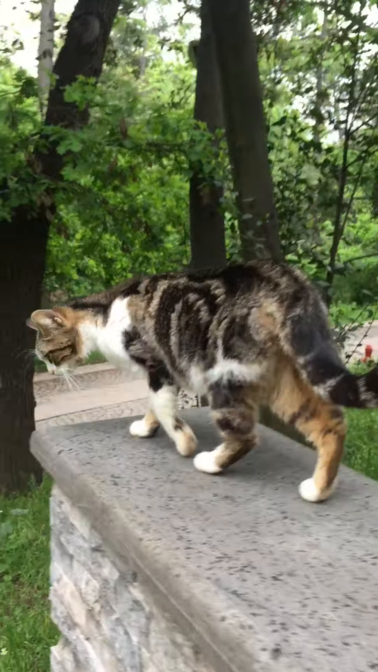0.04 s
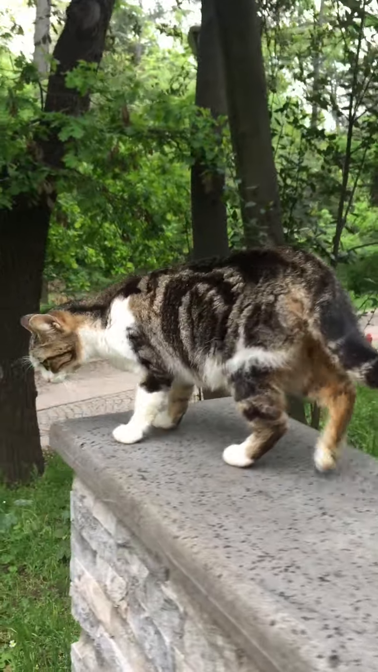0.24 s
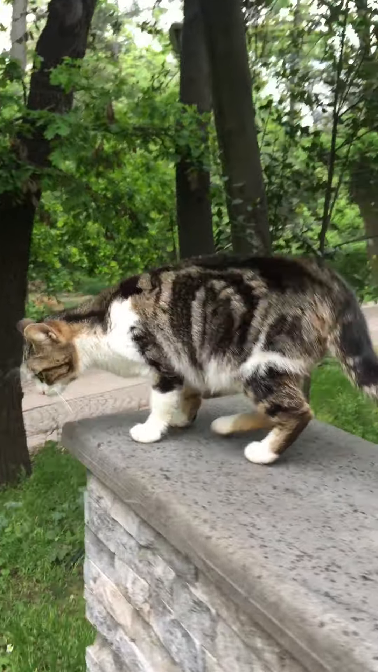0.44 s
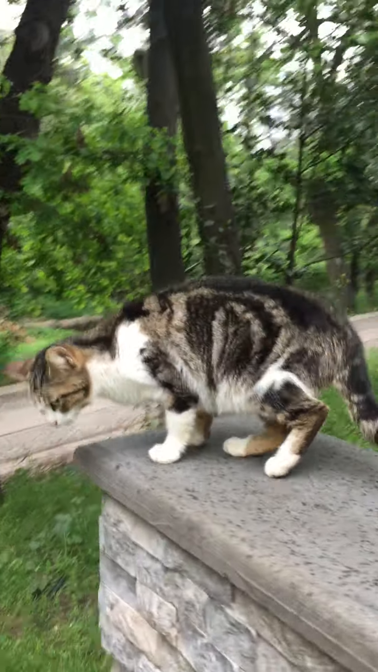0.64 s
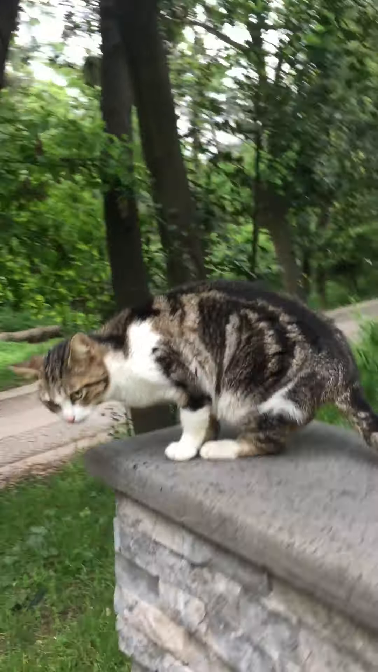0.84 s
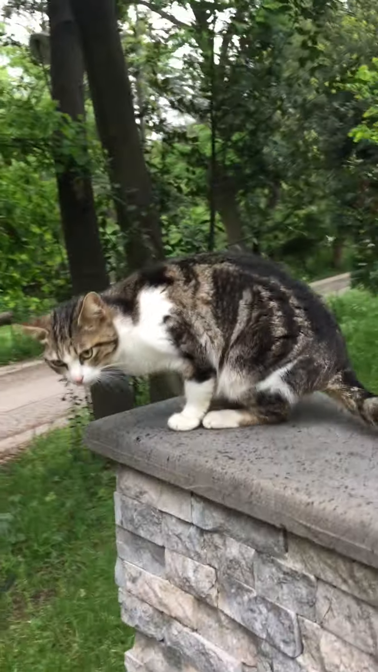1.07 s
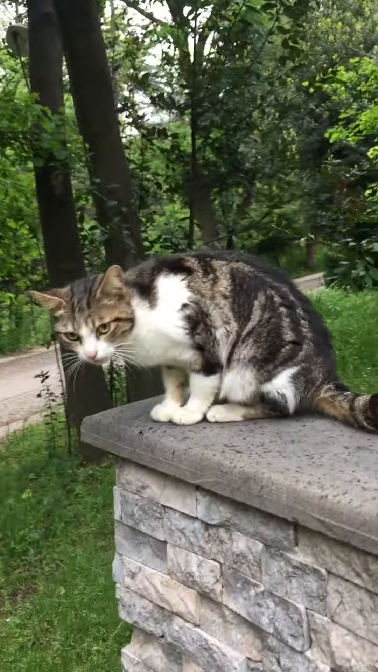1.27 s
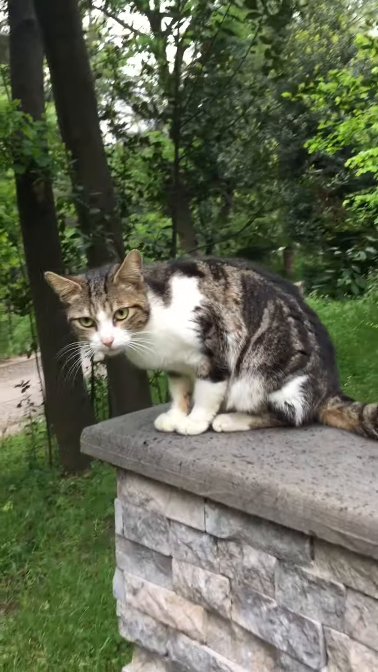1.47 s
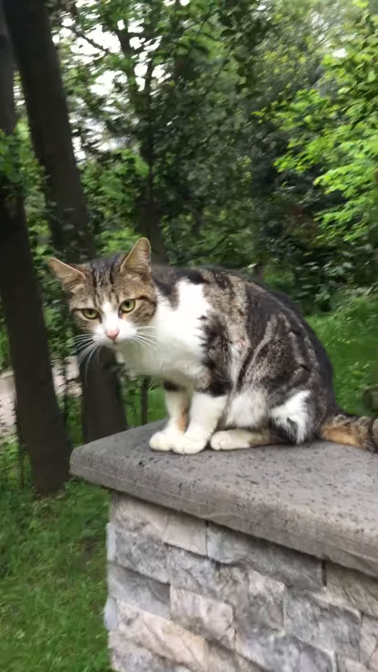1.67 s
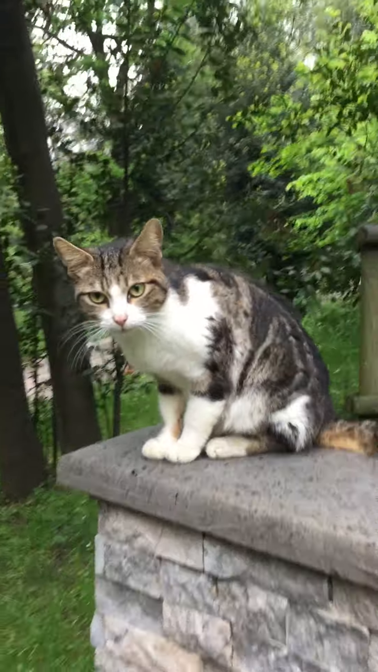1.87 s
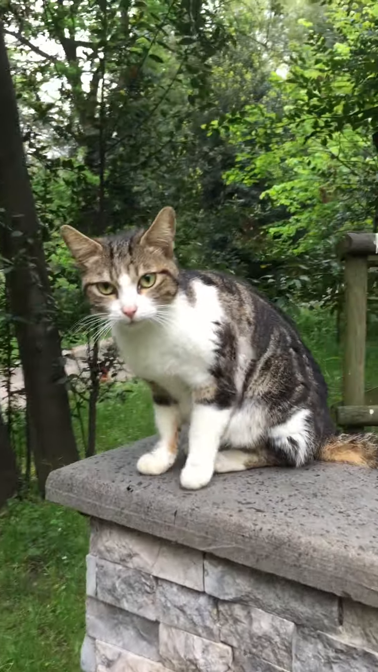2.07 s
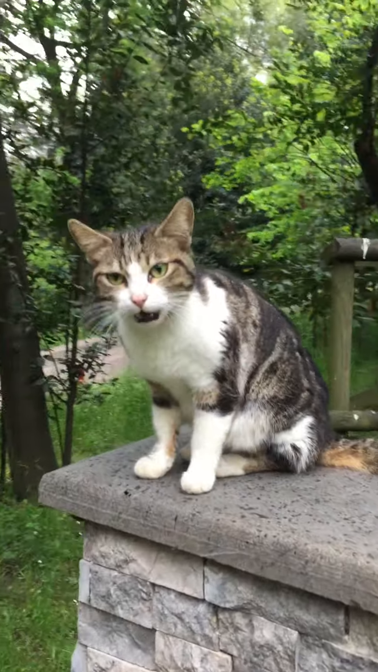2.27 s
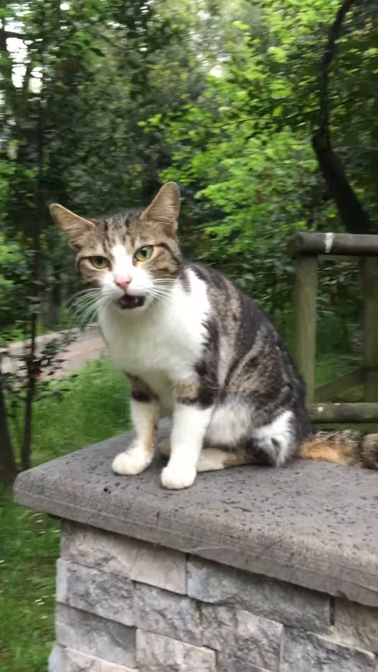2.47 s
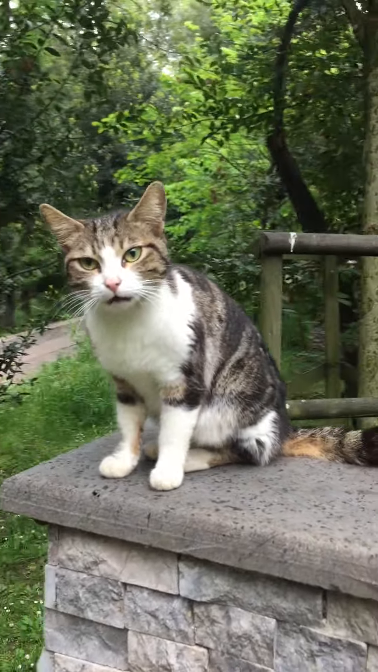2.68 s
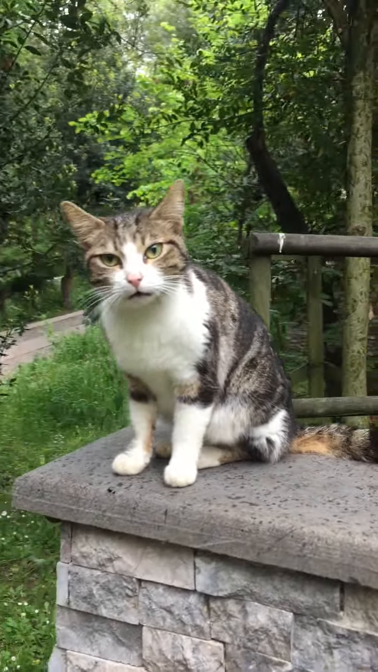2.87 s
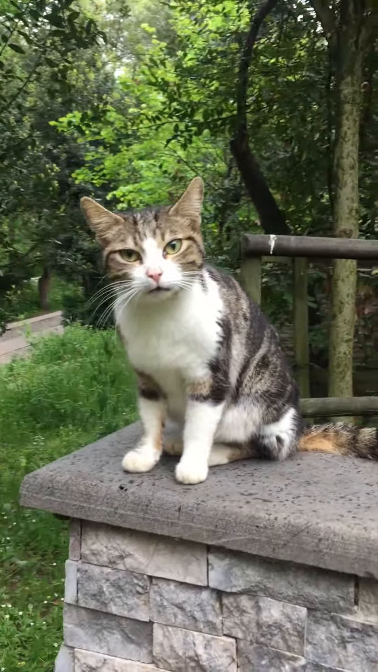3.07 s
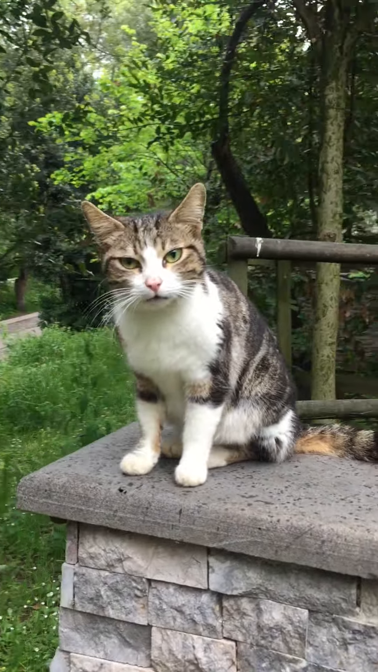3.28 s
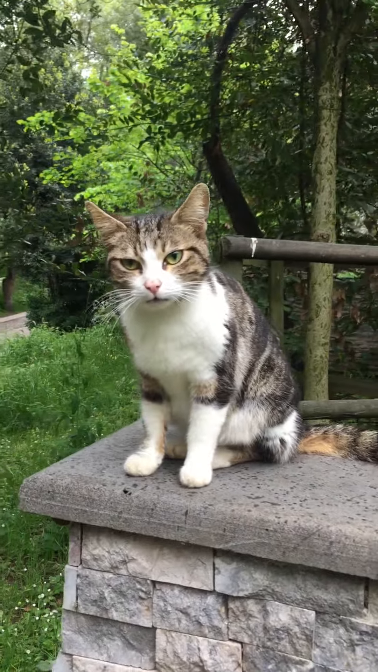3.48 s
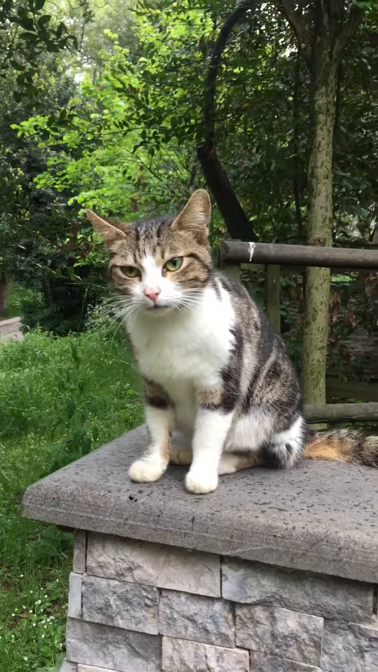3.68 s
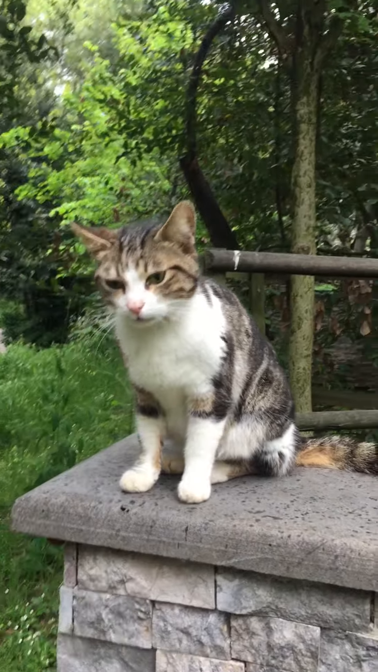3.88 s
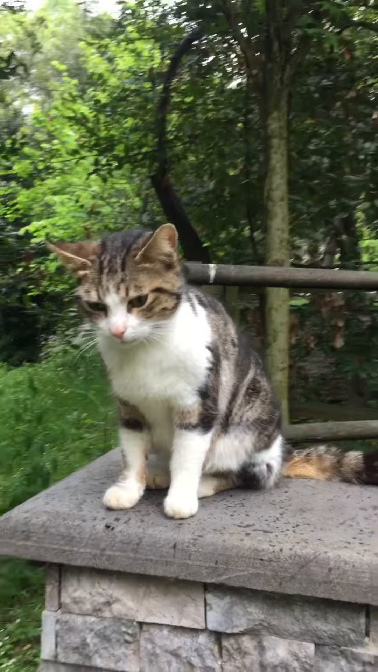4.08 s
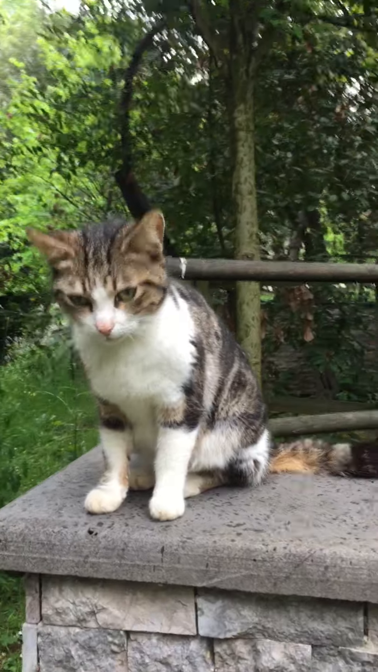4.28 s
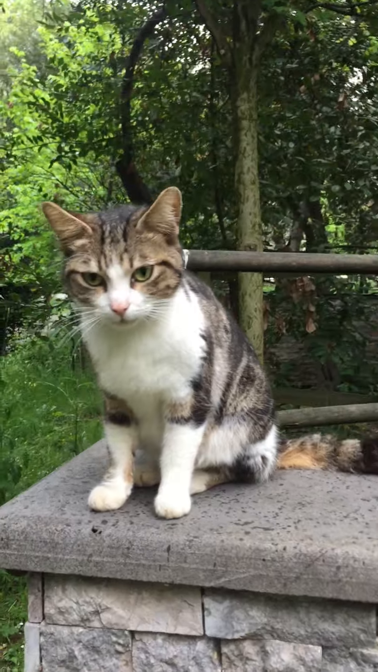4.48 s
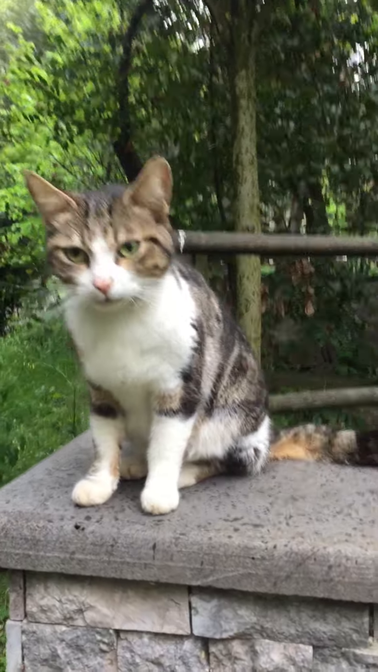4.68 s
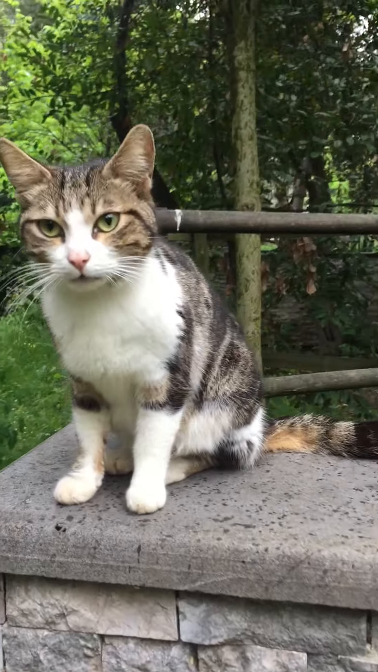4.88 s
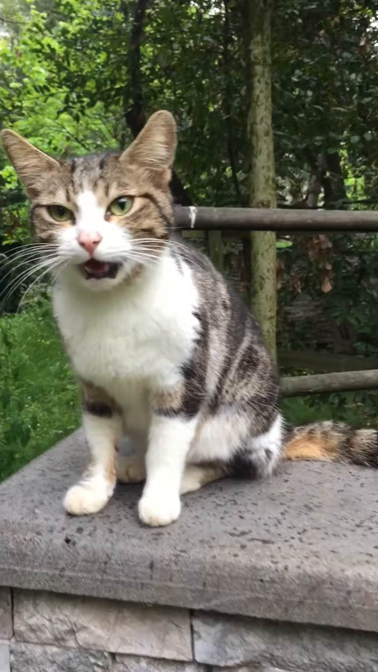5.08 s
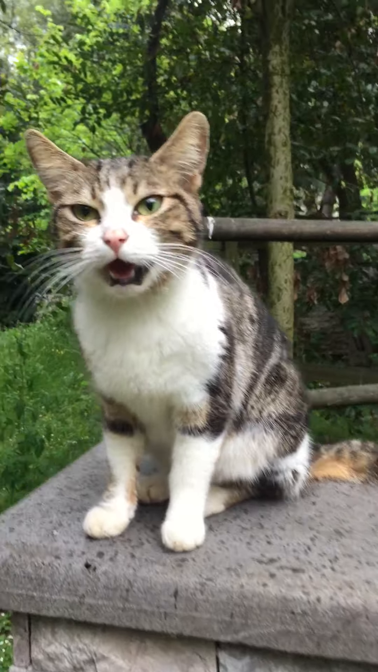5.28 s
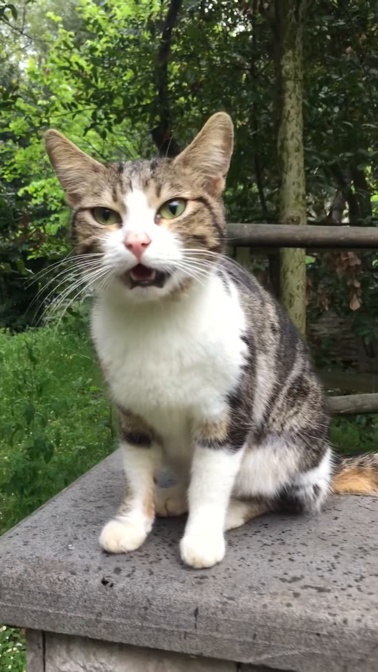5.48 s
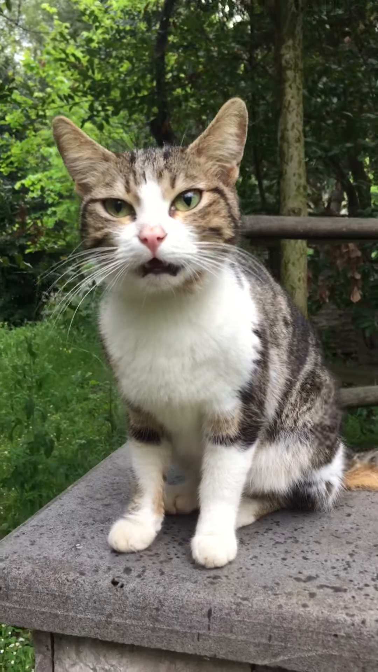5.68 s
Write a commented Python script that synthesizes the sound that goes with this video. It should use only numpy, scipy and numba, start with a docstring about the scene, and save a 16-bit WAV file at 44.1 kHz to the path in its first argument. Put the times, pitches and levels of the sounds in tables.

```python
"""Distant traffic rumbles across a park and birds call from the trees; then a cat on a stone wall,
close to the phone, gives two low, raspy meows with small ticks and rustles around them.
Its vocal folds snap in uneven pulses that ring the throat, and the resonances sink as the mouth closes.
Birds are arched whistles, ticks are ringing bursts of noise, and the traffic is banded noise and hums."""
import sys
import numpy as np
from scipy import signal
from scipy.fft import rfft, irfft
from scipy.io import wavfile
from scipy.ndimage import uniform_filter1d
from numba import njit

SR = 44100
rng = np.random.default_rng(int(sys.argv[2]) if len(sys.argv) > 2 else 0)


def bounce(signal):
    """Save signal as a 16-bit WAV file at the path given by the first command-line argument."""
    frames = np.transpose(np.atleast_2d(signal))
    limited = np.clip(frames, -1, 1)
    pcm = np.round(limited * 32767).astype(np.int16)
    wavfile.write(sys.argv[1], SR, pcm)


N = 253134

# The two calls of the cat. Each row: start in seconds, end in seconds, time constant of the opening
# treble in seconds, steady scatter of the cycle length as a share, steady air noise as a share.
MEOWS = [(2.419, 2.965, .11, .013, .18), (5.262, 5.78, .2, .004, .1)]
# Vocal fold rate of each meow. Each row: time in seconds, pitch in Hz.
PITCH_1 = [(2.42, 225.1), (2.488, 240.2), (2.518, 236.7), (2.558, 275.2), (2.578, 279.6), (2.67, 260.4),
           (2.736, 199.5), (2.754, 191), (2.806, 189.0), (2.9, 125.2), (2.95, 145.7)]
PITCH_2 = [(5.29, 327), (5.312, 324.5), (5.346, 290.7), (5.42, 286.4), (5.458, 280), (5.534, 272.6),
           (5.56, 250.6), (5.59, 250.5), (5.628, 223), (5.638, 221.6), (5.7, 199.7), (5.716, 168.7),
           (5.74, 171.6)]
# Strength of each meow. Each row: time in seconds, level of the first resonance in dB.
EFFORT_1 = [(2.42, -54.5), (2.454, -47.5), (2.662, -44.5), (2.866, -49.5), (2.89, -54.5), (2.944, -51.5),
            (2.96, -51.5)]
EFFORT_2 = [(5.27, -65), (5.306, -47.5), (5.376, -41.5), (5.554, -39), (5.62, -41.5), (5.674, -41.5),
            (5.74, -45.5)]
# Mouth shape of each meow. Each row: time in seconds, vowel (0 = ee, 1 = eh, 2 = ah, 3 = ow).
MOUTH_1 = [(2.42, 1.12), (2.5, 1.62), (2.63, 1.84), (2.73, 2.5), (2.95, 2.75)]
MOUTH_2 = [(5.286, -0.5), (5.316, 1.4), (5.37, 1), (5.52, 1.77), (5.63, 2), (5.74, 2.5)]
# The vowels ee, eh, ah, ow. Each row: first, second, third and fourth resonance in Hz, then the
# second, third and upper resonances in dB relative to the first.
VOWELS = [(1000, 2210, 2680, 3600, 19, 18, 3.5), (1046, 1984, 3080, 4020, 5.5, 2, -0.5),
          (1049, 1817, 2910, 4350, -0.5, 0, -10), (1015, 1330, 2680, 4400, -8, -14, -27.5)]
# Weak low resonance of chest and nose. One row: centre in Hz, width in Hz, dB relative to the first.
NOSE = (630, 210, -13.5)
# Upper throat resonances at rest. Each row: centre in Hz, width in Hz, relative level in dB.
UPPER = [(4590, 98, 6), (5230, 600, 2.5), (6490, 760, 3), (7030, 1500, 1.5), (7900, 2700, 1),
         (9340, 680, -3.5)]
# Brief cracks of the voice. Each row: time in seconds, extra scatter as a share.
CRACKS = [(2.54, .045), (2.59, .018), (2.72, .035), (5.42, .03), (5.47, .009), (5.5, .01), (5.64, .022)]
# Ticks of paws, lips and throat, and rustles. Each row: start in seconds, level in dB, centre in Hz,
# width in Hz, decay in seconds.
TICKS = [(.235, -75, 11000, 8000, .03), (2.358, -63, 11600, 6000, .006), (2.414, -50, 2600, 2980, 0.0037),
         (2.939, -51.5, 362, 129.8, 0.032), (2.953, -52, 1700, 1200, 0.018), (2.967, -54, 4310, 200, 0.012),
         (2.971, -63, 6260, 905, 0.029), (4.835, -68.5, 6450, 8000, 0.021), (5.014, -66, 6000, 10800, 0.15),
         (5.265, -41, 2310, 1000, 0.0027), (5.273, -33, 2430, 910, 0.001)]
# Bird notes. Each row: start in seconds, length in seconds, start, middle and end pitch in Hz,
# level in dB.
BIRDS = [(0.815, 0.12, 7500, 7750, 7570, -65.5), (.81, 0.26, 1190, 1161, 1106, -64),
         (1.304, 0.062, 2020, 2016, 1940, -63.5), (1.566, 0.092, 2057, 1964, 1830, -55.5),
         (1.865, 0.069, 1963, 1980, 1900, -54), (2.147, 0.073, 2056, 1967, 1930, -59.5),
         (2.877, 0.052, 4280, 3720, 3230, -66), (3.11, 0.061, 2880, 2810, 2700, -73),
         (3.431, 0.057, 2830, 2780, 2750, -73), (4.042, 0.047, 3370, 3120, 2920, -64),
         (4.165, 0.061, 7400, 7500, 6600, -61.5)]
# Spectrum of the distant traffic. Each row: frequency in Hz, relative density in dB per Hz.
PARK = [(15, -47), (25, -39), (49, 2.5), (96, 1.5), (123, -4), (161, -3.5), (275, -8.5), (351, -17.5),
        (570, -27.5), (1120, -26.5), (1350, -30.5), (4920, -48), (7780, -50), (8430, -52), (15700, -56.5)]
# Far vehicles that swell the drone. Each row: time in seconds, half-length in seconds, swell in dB.
VEHICLES = [(0.048, 0.25, 7), (1.393, 0.18, 5.5), (2.86, 0.29, 4.5), (3.982, 0.43, 7.5), (5.495, 0.31, 1.5)]

# the treble edge rises as the jaw drops
EDGE_SHUT_HZ, EDGE_OPEN_HZ = 5200, 9700
# the folds start unevenly and settle: extra scatter as a share, and its decay
ONSET_SCATTER, SETTLE_S = .11, .016
# below this pitch the voice falls into creak, more uneven with every Hz
CREAK_HZ, CREAK_SCATTER_PER_HZ = 180, .0015
# half-length of a crack; uneven folds leak more air (share of air per share of scatter)
CRACK_S, AIR_PER_SCATTER = .014, 3
# second harmonic of a 2 kHz bird note, and its change for each octave higher
BIRD_HARMONIC_DB, BIRD_HARMONIC_DB_PER_OCTAVE = -22, -9
# level of the traffic noise before the drone and tyre bands are shaped
PARK_DB = -47
# drone between vehicles; the tyre wash slowly recedes
DRONE_DB, TYRE_DB, TYRE_DB_PER_S = -3.5, 5, -0.32
# a far engine draws nearer and speeds up: pitch and level at the start, and their rise
ENGINE_HZ, ENGINE_HZ_PER_S, ENGINE_DB, ENGINE_DB_PER_S = 63.13, 1.5, -60.5, 2
# a second engine passes, its pitch falling from one swing above the middle to one below
PASS_S, PASS_HALF_S, PASS_HZ, PASS_SWING_HZ, PASS_DB = 4.08, 0.167, 186.2, 12, -51.5
TOP_HZ = 15800  # upper limit of the phone


def undb(db):
    """Decibels to gain."""
    return 10 ** (np.asarray(db) / 20)


def curves(table):
    """The columns of a table, joined by straight lines in time."""
    s, *columns = np.transpose(table)
    return [np.interp(np.arange(N) / SR, s, c) for c in columns]


def unit(x):
    """Scale to rms 1."""
    return x / np.sqrt(np.mean(x ** 2))


def smooth_twice(x, size):
    """Two running means in a row."""
    return uniform_filter1d(uniform_filter1d(x, size), size)


def even(x):
    """Hold the running rms near 1 while keeping single pulses apart."""
    power = smooth_twice(x ** 2, SR // 50)
    return x / np.sqrt(np.abs(power) + 1e-14)


@njit
def svf(x, hz, width):
    """State-variable filter with moving centre and width: band-pass and low-pass outputs."""
    band, low = np.empty(len(x)), np.empty(len(x))
    b, l = 0., 0.
    for i in range(len(x)):
        g = np.tan(np.pi * min(hz[i], .45 * SR) / SR)
        k = width[i] / hz[i]
        v = (b + g * (x[i] - l)) / (1 + g * (g + k))
        band[i], low[i] = k * v, l + g * v
        b, l = 2 * v - b, l + 2 * g * v
    return band, low


def ring(x, hz, width_hz):
    """One resonance, gain 1 at its centre."""
    return svf(x + 1e-18, hz + np.zeros(len(x)), width_hz + np.zeros(len(x)))[0]


def below(x, hz, order=3):
    """Steep low-pass with a moving edge."""
    for k in range(order):
        x = svf(x + 1e-18, hz, 2 * hz * np.sin(np.pi * (k + .5) / (2 * order)))[1]
    return x


def above(x, hz, order=2):
    """High-pass."""
    return signal.sosfilt(signal.butter(order, hz, "high", fs=SR, output="sos"), x)


def walk(rate):
    """Random levels held 1 / rate s and slewed twice; spread near 1."""
    hold = int(SR / rate)
    steps = np.repeat(rng.standard_normal(N // hold + 1), hold)
    return smooth_twice(steps, hold)[:N] * np.sqrt(2)


def meow(pitch, effort, mouth, call, drift=0.028, fourth_db=7.5):
    """Fold pulses ring three strong mouth resonances and a row of weaker, breathier ones above a dark gap."""
    start, end, opening_s, steady_scatter, steady_air = call
    t = np.arange(N) / SR
    age = np.maximum(t - start, 0)
    (fold_hz,), (level_db,) = curves(pitch), curves(effort)
    scatter, air = rasp(fold_hz, age, steady_scatter, steady_air)
    source, breathy = folds(fold_hz, scatter, air)
    f1, f2, f3, f4, second_db, third_db, upper_db = vowel(mouth)
    damping = 1 + 4.5 * air  # leaky folds widen the resonances

    nose_hz, nose_width, nose_db = NOSE
    nose = even(ring(ring(source, nose_hz, nose_width), nose_hz, width_hz=310))
    first = even(ring(ring(source, f1, 190 * damping), f1, width_hz=350))
    second = even(ring(ring(source, f2, 170 * damping), f2, width_hz=260))
    third = even(ring(ring(source, f3, 330 * damping), f3, width_hz=590))
    body = undb(nose_db) * nose + first + undb(second_db) * second + undb(third_db) * third
    body = below(body, 1.035 * f3, order=6)

    upper = undb(fourth_db) * ring(ring(breathy, f4, 170 * damping), f4, width_hz=1500)
    for hz, width, db in UPPER:
        # these sink with the third resonance and wander as the tongue moves
        centre = hz * (f3 / 2960) ** 0.27 * (1 + drift * walk(25))
        upper = upper + undb(db) * ring(ring(breathy, centre, width), centre, width_hz=1100)
    edge_hz = EDGE_OPEN_HZ + (EDGE_SHUT_HZ - EDGE_OPEN_HZ) * np.exp(-age / opening_s)
    upper = even(below(above(upper, hz=3760, order=4), edge_hz, order=4))

    voiced = np.clip(age / 0.0029, 0, 1) * np.clip((end - t) / 0.01, 0, 1)
    return -voiced * undb(level_db) * (body + undb(upper_db) * upper)


def folds(hz, scatter, air, shimmer_db=1.5, sharpness_db=1.0, puff_s=0.00085):
    """One snap per cycle of the vocal folds, uneven in time and size, each followed by a puff of air.
    Returns the drive of the low resonances and the breathier drive of the treble."""
    cycles = np.cumsum(hz) / SR
    at = np.interp(np.arange(1, cycles[-1]), cycles, np.arange(N))  # snap times in samples
    # columns: timing, size, sharpness
    chance = rng.standard_normal((len(at) + 2, 3))
    loose = scatter[at.astype(int)]
    period = SR / hz[at.astype(int)]
    at = np.clip(at + chance[2:, 0] * loose * period, 8, N - 10)
    size = undb(chance[2:, 1] * shimmer_db * np.sqrt(np.minimum(loose, .06) / .02))

    # a short windowed sinc places each snap between samples
    taps = at.astype(int)[:, None] + np.arange(-7, 9)
    offset = taps - at[:, None]
    snaps = np.zeros(N)
    np.add.at(snaps, taps, size[:, None] * np.sinc(offset) * np.cos(np.pi * offset / 16) ** 2)
    puff_shape = signal.lfilter([1], [1, -np.exp(-1 / (puff_s * SR))], snaps)
    puffs = air * unit(puff_shape * rng.standard_normal(N))
    snaps = unit(snaps)

    # some closures are sharper than others, so the treble varies from cycle to cycle
    sharpness = undb(sharpness_db * chance[np.round(cycles).astype(int), 2])
    leak = 1.45 * air * rng.standard_normal(N)  # a thin hiss escapes all through the cycle
    return snaps + puffs, sharpness * (snaps + 3.5 * puffs) + leak


def rasp(hz, age, steady_scatter, steady_air):
    """Scatter of the fold cycles and leak of air: greater at the onset, in cracks and in low creak."""
    t = np.arange(N) / SR
    onset = ONSET_SCATTER * np.exp(-age / SETTLE_S)
    creak = CREAK_SCATTER_PER_HZ * np.maximum(CREAK_HZ - hz, 0)
    cracks = sum(share * np.exp(-((t - s) / CRACK_S) ** 2) for s, share in CRACKS)
    extra = onset + creak + cracks
    return steady_scatter + extra, steady_air + AIR_PER_SCATTER * extra


def vowel(mouth):
    """Resonances and their strengths as the mouth glides through the vowels."""
    shape, = curves(mouth)
    return [np.interp(shape, np.arange(len(VOWELS)), column) for column in np.transpose(VOWELS)]


def ticks():
    """Short bursts of noise, each ringing its own band."""
    t = np.arange(N) / SR
    out = 0
    for start, db, hz, width, decay in TICKS:
        burst = (t >= start) * np.exp(-np.abs(t - start) / decay) * rng.standard_normal(N)
        makeup = np.sqrt(2 * SR / (np.pi * width))  # a narrow band passes less of the noise
        out = out + undb(db) * makeup * ring(ring(burst, hz, width), hz, width)
    return out


def birds():
    """Each note is an arched, slightly wavering whistle with a weak second harmonic."""
    out = np.zeros(N)
    waver = 1 + 0.003 * walk(150)
    for start, length, hz0, hz1, hz2, db in BIRDS:
        second_db = BIRD_HARMONIC_DB + BIRD_HARMONIC_DB_PER_OCTAVE * np.log2(hz1 / 2000)
        i, u = int(start * SR), np.linspace(0, 1, int(length * SR))
        arch = np.polyfit([0, .5, 1], [hz0, hz1, hz2], 2)
        hz = np.polyval(arch, u) * waver[i:i + len(u)]
        phase = 2 * np.pi * np.cumsum(hz) / SR
        whistle = np.sin(phase) + undb(second_db) * np.sin(2 * phase)
        out[i:i + len(u)] += undb(db) * np.sin(np.pi * u) * whistle
    return out


def trees(x, t60):
    """Diffuse scatter from trunks and leaves: a decaying noise tail after a 6 ms gap."""
    t = np.arange(SR // 2) / SR
    tail = rng.standard_normal(len(t)) * np.exp(-np.log(1000) * t / t60) * (t > .006)
    return signal.fftconvolve(x, tail / np.linalg.norm(tail))[:N]


def park(flicker_db=2.6):
    """Far traffic in quarter-octave bands: engines swell in the low ones and tyres in the middle ones."""
    t = np.arange(N) / SR
    drone_db = DRONE_DB + sum(db * np.exp(-((t - s) / half) ** 2) for s, half, db in VEHICLES)
    tyre_db = TYRE_DB + TYRE_DB_PER_S * t
    octave = np.log2(np.maximum(np.arange(N // 2 + 1) * SR / N, 1))  # octaves above 1 Hz
    hz, db = np.transpose(PARK)
    spectrum = rfft(rng.standard_normal(N)) * undb(np.interp(octave, np.log2(hz), db))
    spectrum /= np.std(irfft(spectrum, N))
    out = irfft(spectrum, N)
    for centre in np.arange(6.5, 11.5, .25):
        band = irfft(spectrum * np.clip(1 - 4 * np.abs(octave - centre), 0, 1), N)
        # the drone centres on 200 Hz, the tyre wash on 1 kHz
        drone = np.exp(-2 * (centre - np.log2(200)) ** 2)
        tyres = np.exp(-(centre - np.log2(1000)) ** 2 / 2)
        band_db = drone * drone_db + tyres * tyre_db + flicker_db * walk(11)
        out = out + band * (undb(band_db) - 1)  # the band is already in once
    return undb(PARK_DB) * out + engines()


def engines():
    """One engine slowly approaches; another passes, loudest when nearest."""
    t = np.arange(N) / SR
    along = (t - PASS_S) / PASS_HALF_S
    distance = np.hypot(along, 1)  # 1 at the nearest point
    approaching = hum(ENGINE_HZ + ENGINE_HZ_PER_S * t, ENGINE_DB + ENGINE_DB_PER_S * t)
    passing = hum(PASS_HZ - PASS_SWING_HZ * along / distance, PASS_DB, waver=.05) / distance
    return approaching + passing


def hum(hz, db, waver=0.025):
    """The firing tone of a far engine, wavering in pitch and level."""
    tone = np.sin(2 * np.pi * np.cumsum(hz * (1 + waver * walk(14))) / SR)
    return undb(db + 2.4 * walk(8.9)) * unit(tone)


def scene():
    """The cat is near and almost dry; the birds come through the trees."""
    cat = meow(PITCH_1, EFFORT_1, MOUTH_1, MEOWS[0]) + meow(PITCH_2, EFFORT_2, MOUTH_2, MEOWS[1])
    cat = cat + undb(-17) * trees(cat, t60=.2)
    song = birds()
    song = song + undb(-2) * trees(song, t60=0.23)
    return (cat + song + ticks() + park())[None]


def record(dry):
    """The phone cuts the top with a steep low-pass."""
    return signal.sosfilt(signal.ellip(10, .1, 70, TOP_HZ, fs=SR, output="sos"), dry)


dry = scene()
out = record(dry)
bounce(out)
```